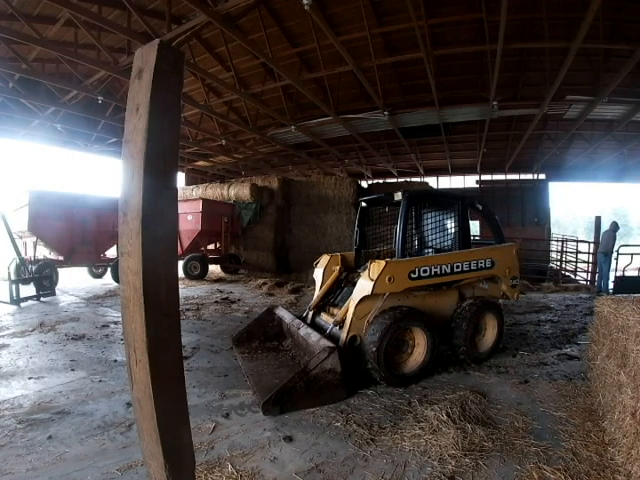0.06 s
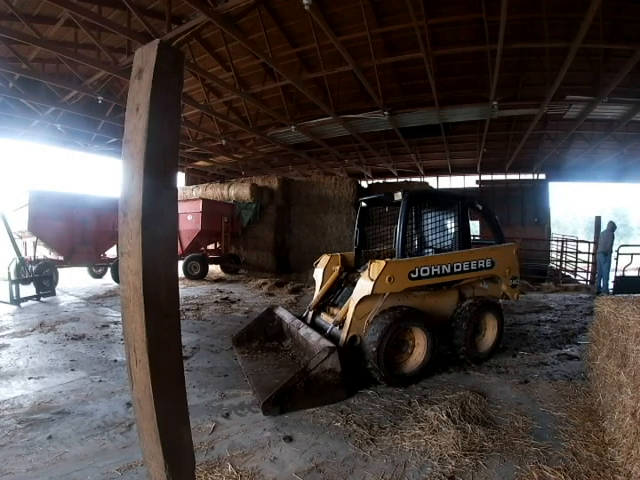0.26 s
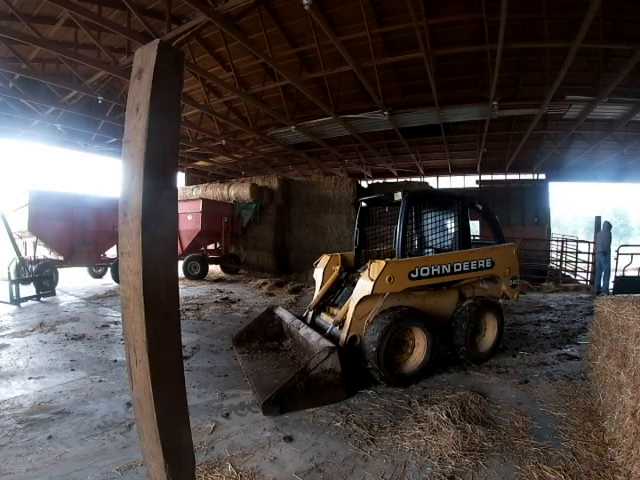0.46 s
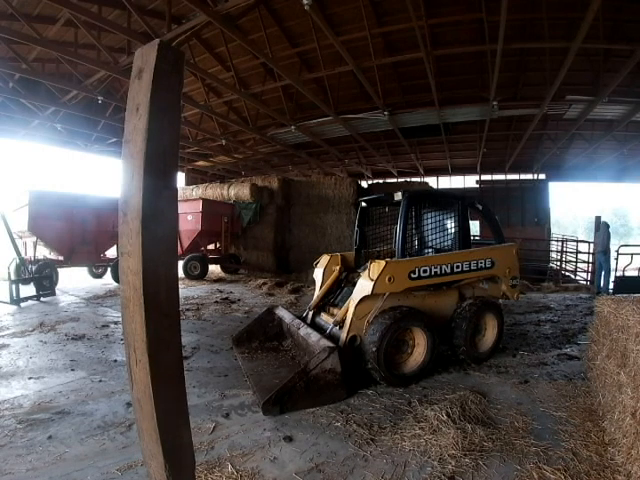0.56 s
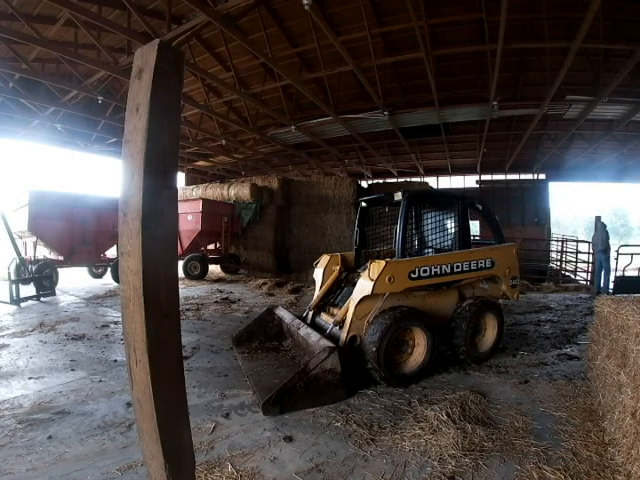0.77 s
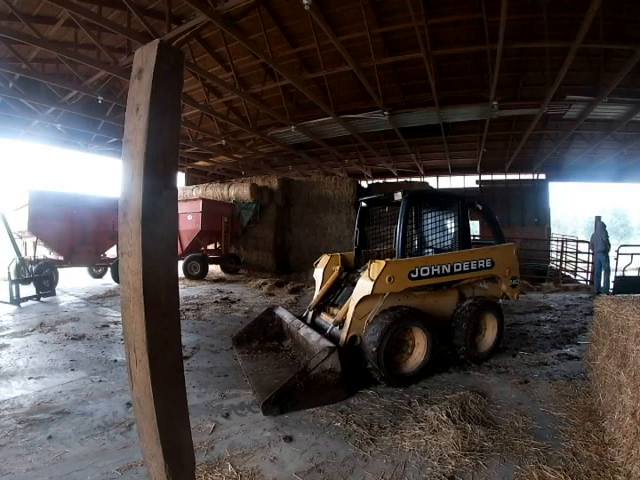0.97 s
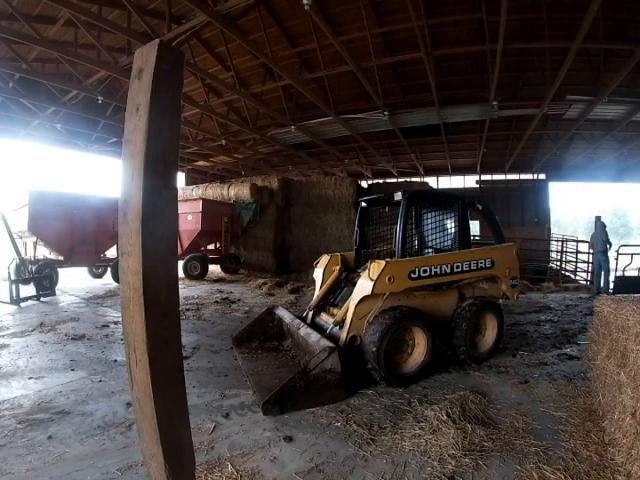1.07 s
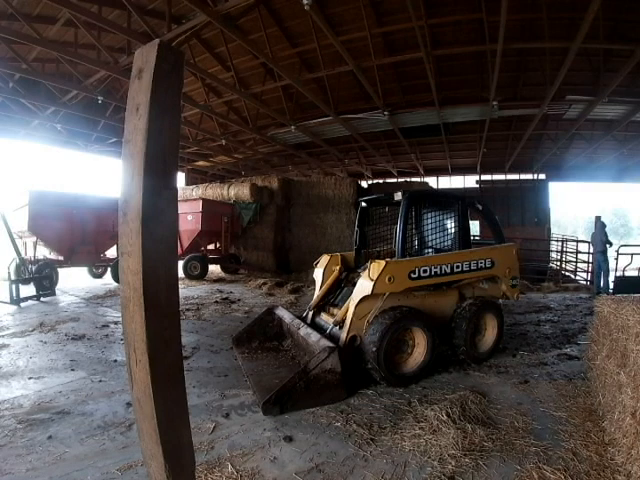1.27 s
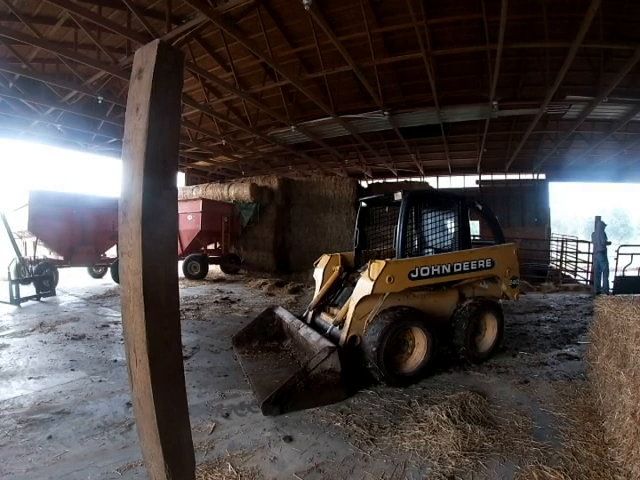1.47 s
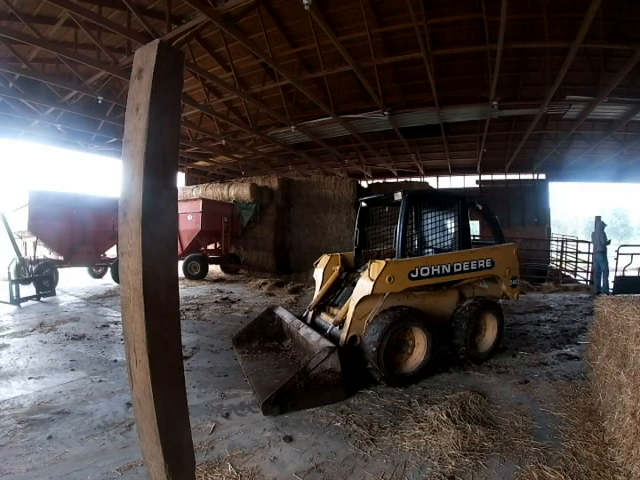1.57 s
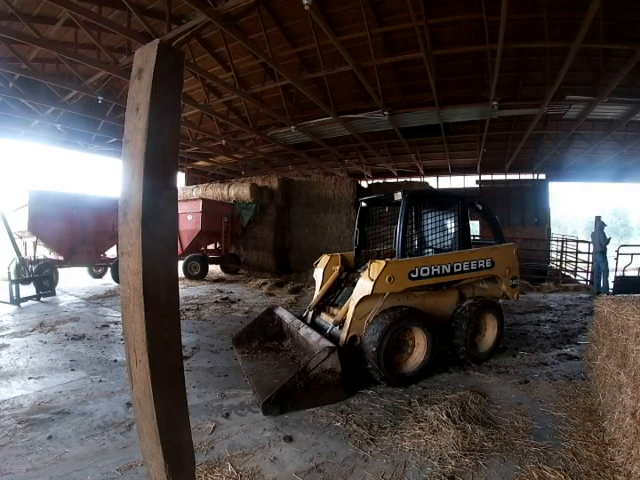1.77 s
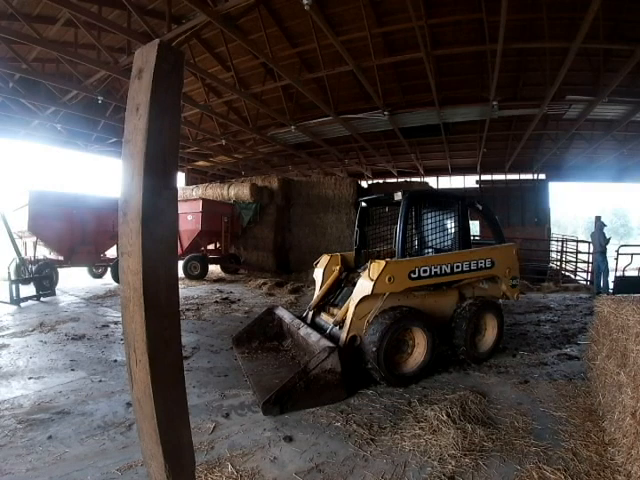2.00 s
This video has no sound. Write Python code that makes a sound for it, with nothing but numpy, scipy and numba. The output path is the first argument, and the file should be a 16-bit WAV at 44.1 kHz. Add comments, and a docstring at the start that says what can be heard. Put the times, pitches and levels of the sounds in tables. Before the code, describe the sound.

One loud cow moo swells from a hoarse closed-mouth groan, then drops to a grunt in an echoing barn

```python
"""A cow gives one long moo in a large echoing barn, over a faint rumble and a thin hiss of filtered noise.
It starts as a low hoarse groan, made of breathy pulses through the nose and a thin nostril whistle, and climbs.
As the mouth opens, the voice breaks into a loud clear bellow near 215 Hz: sine partials below, pulses through
throat resonances above, with a growl at its height. It sags into a rough grunt. Roof and walls answer
throughout, with a decaying noise echo and two ringing notes."""
import sys
import numpy as np
from scipy import signal
from scipy.fft import rfft, irfft
from scipy.io import wavfile
from scipy.ndimage import uniform_filter1d
from numba import njit

SR = 44100
rng = np.random.default_rng(int(sys.argv[2]) if len(sys.argv) > 2 else 0)


def generate_wav(sig):
    """Save sig (samples, or channels by samples) to the path in sys.argv[1] as 16-bit PCM at SR."""
    pcm = np.round(np.clip(np.atleast_2d(sig).T, -1, 1) * 32767).astype(np.int16)
    wavfile.write(sys.argv[1], SR, pcm)


N = 89743
TIME = np.arange(N) / SR  # seconds

# The five lowest partials of the voice, one curve each. Each row: time in seconds, level in dB.
PARTIAL_LEVELS = [
    [(.2, -73), (.46, -59), (.6, -36), (.69, -34.5), (.72, -34.5), (.81, -24.5), (1.01, -28.5),
     (1.08, -14.5), (1.28, -13), (1.75, -14.5), (1.82, -23.5), (1.9, -31.5), (2.0, -40.5)],
    [(.2, -59), (.47, -49.5), (.54, -40), (.64, -40), (.69, -29), (.75, -41), (.8, -36.5), (1.0, -52),
     (1.12, -34.5), (1.2, -48), (1.31, -34), (1.39, -43.5), (1.5, -27), (1.67, -41), (1.81, -34),
     (1.96, -29), (2.03, -39)],
    [(.15, -64), (.38, -47.5), (.55, -61), (.7, -57), (.79, -32), (.85, -62), (.9, -33), (1.11, -34.5),
     (1.18, -21), (1.39, -18), (1.46, -27), (1.56, -21), (1.74, -20), (1.79, -35.5), (1.86, -22.5),
     (1.92, -52)],
    [(.3, -58), (.7, -45.5), (.86, -41), (1.0, -42.5), (1.17, -25.5), (1.32, -42), (1.41, -36.5),
     (1.52, -57), (1.69, -52), (1.76, -41.5), (1.95, -63)],
    [(.3, -72), (.76, -47), (.825, -20), (.87, -30), (1.26, -30), (1.32, -39.5), (1.49, -30), (1.66, -41),
     (1.82, -29.5), (1.86, -21), (1.9, -28), (1.98, -88.5)],
]


def from_db(db):
    """Turn decibels into a gain."""
    return 10 ** (np.asarray(db) / 20)


def rms_one(x):
    """Scale to an rms (average strength) of 1."""
    return x / np.sqrt(np.mean(x ** 2) + 1e-20)


def in_time(rows):
    """Draw each column of a curve as straight lines, with a value at every sample."""
    s, *columns = np.transpose(rows)
    return [np.interp(TIME, s, c) for c in columns]


def at_hz(points, hz):
    """Read a table along a logarithmic frequency axis."""
    f, value = np.transpose(points)
    return np.interp(np.log(hz + 1e-9), np.log(f), value)


def drift(rate):
    """Random wandering with spread 1: noise smoothed by two equal low-pass stages at `rate` Hz."""
    r = np.exp(-2 * np.pi * rate / SR)
    wander = signal.lfilter([1], [1, -2 * r, r * r], rng.standard_normal(N + SR))
    return rms_one(wander[SR:])  # drop the first second, while the filter settles


def resonate(x, hz, width):
    """One resonance with gain 1 at its peak; a wider one dies away sooner."""
    r = np.exp(-np.pi * width / SR)
    feedback = [1, -2 * r * np.cos(2 * np.pi * hz / SR), r * r]
    return signal.lfilter(np.array([1, 0, -1]) * (1 - r * r) / 2, feedback, x)


def formants(x, modes):
    """Side-by-side resonances, each applied twice at double width, for dark valleys between them."""
    out = 0
    for hz, width, db in modes:
        once = resonate(x, hz, 2 * width)
        out = out + from_db(db) * resonate(once, hz, 2 * width)
    return out


@njit
def glide_resonate(x, turn, r):
    """A resonance whose centre (radians per sample) moves."""
    y = np.zeros(len(x))
    for i in range(2, len(x)):
        drive = (1 - r * r) / 2 * (x[i] - x[i - 2])
        y[i] = drive + 2 * r * np.cos(turn[i]) * y[i - 1] - r * r * y[i - 2]
    return y


def moving_formants(x, modes, stretch):
    """Side-by-side double resonances whose pitches all follow the curve `stretch`."""
    factor, = in_time(stretch)
    out = 0
    for hz, width, db in modes:
        turn = 2 * np.pi * hz * factor / SR
        r = np.exp(-2 * np.pi * width / SR)  # double width, as in formants()
        once = glide_resonate(x, turn, r)
        out = out + from_db(db) * glide_resonate(once, turn, r)
    return out


def cut(x, hz, kind, order=2):
    """High-pass or low-pass filter."""
    return signal.sosfilt(signal.butter(order, min(hz, SR / 2 - 100), kind, fs=SR, output="sos"), x)


def fold_phase(pitch, unsteadiness):
    """Add up a pitch in Hz, with its jitter, into the phase of a vibration."""
    return 2 * np.pi * np.cumsum(pitch * (1 + unsteadiness)) / SR


def fold_pulses(phase, count=54):
    """Sharp pulses of the vocal folds: `count` equal harmonics above the lowest partials, in one formula."""
    first = len(PARTIAL_LEVELS) + 1
    centre = first + (count - 1) / 2
    envelope = np.sin(count * phase / 2) / (np.sin(phase / 2) + 1e-12)
    return rms_one(envelope * np.cos(centre * phase))


def ambience():
    """Steady farmyard air, noise shaped to include a thin hiss, plus noise ringing a low rumble."""
    # Colour of the air. Each row: frequency in Hz, relative density in dB per Hz.
    air_colour = [(25, -35), (50, -17), (90, -11.5), (120, -3.5), (240, 0), (400, -14), (700, -11),
                  (1300, -14.5), (2400, -19), (3500, -25.5), (4400, -23.5), (4900, -12), (5450, -10.5),
                  (5900, -18), (6750, -19), (7050, -28.5), (8000, -35.5), (9000, -48.5), (9750, -35),
                  (10400, -56), (13000, -68.5)]
    # Strength of the rumble. Each row: time in seconds, level in dB.
    rumble_level = [(0, -54), (.35, -61.5), (.75, -57.5), (1.0, -50.5), (1.3, -57.5), (2.03, -62.5)]
    air_db, rumble_hz, rumble_width_hz = -51.5, 73, 11
    white = rfft(rng.standard_normal(N))
    hz = np.arange(len(white)) * SR / N
    air = irfft(white * from_db(at_hz(air_colour, hz)), N)
    rumble = formants(rng.standard_normal(N + SR), [(rumble_hz, rumble_width_hz, 0)])[SR:]
    rumble = rms_one(cut(rumble, 48, "high", order=4))
    rumble_db, = in_time(rumble_level)
    return from_db(air_db) * rms_one(air) + from_db(rumble_db) * rumble


def clean_partials(phase, rough):
    """Sine waves at the lowest partials carry the body of the moo; they flutter and fray when it is rough."""
    start_s, fade_s = 0.096, 0.19
    flutter_db = 2.5  # at full roughness; half of this for the first partial
    fray_rad, fray_hz = 0.45, 45  # phase scatter added per partial at full roughness, and its rate
    voiced = np.clip((TIME - start_s) / fade_s, 0, 1)
    out = 0
    for k, curve in enumerate(PARTIAL_LEVELS, 1):
        level_db = in_time(curve)[0] + flutter_db * rough * drift(40) * min(k, 2) / 2
        fray = fray_rad * (k - 1) * rough ** 2 * drift(fray_hz)
        out = out + from_db(level_db) * np.sin(k * phase + fray)
    return voiced * out


def roof_notes(x):
    """The call sets off notes that hang under the roof, as narrow resonances."""
    # Each row: pitch in Hz, width in Hz, level in dB.
    roof_modes = [(196.9, 3.6, -2), (627.5, 9.1, -5)]
    return sum(from_db(db) * resonate(x, hz, width) for hz, width, db in roof_modes)


def barn(x):
    """Diffuse echo of roof and walls: noise whose frequency bands die away at different speeds."""
    # How fast the echo fades. Each row: frequency in Hz, time in seconds to fall by 60 dB.
    fade_times = [(150, 0.76), (600, .9), (2000, 0.74), (5000, 0.38), (10000, 0.9)]
    first_echo_s = 0.012
    t, hz = TIME[:SR], np.arange(SR // 2 + 1.)
    white = rfft(rng.standard_normal(SR))
    centres = np.log([f for f, _ in fade_times])
    tail = 0
    for share, (_, t60) in zip(np.eye(len(centres)), fade_times):
        band = irfft(white * np.interp(np.log(hz + 1), centres, share), SR)
        tail = tail + band * from_db(-60 * t / t60)
    tail = tail * (t > first_echo_s)
    gain = np.sqrt(np.mean(np.abs(rfft(tail)[200:3000]) ** 2))  # typical gain from 200 to 3000 Hz
    return signal.fftconvolve(x, tail / gain)[:N]


def upper_voice(phase, level_db, bright_db, rough):
    """Fold pulses, and air let through once a cycle, ring the throat; brightness sets the treble."""
    # Throat and mouth. Each row: pitch in Hz before the jaw moves it, width in Hz, level in dB.
    throat_modes = [(1078, 130, 2), (1220, 69, -3), (1697, 173, -1), (1988, 200, -4.5), (2618, 162, -5.5),
                    (3003, 43, -11.5), (3690, 60, -18), (4220, 80, -16), (4750, 71, -21.5),
                    (5300, 156, -20.5), (5650, 200, -30)]
    # Resonances climb as the jaw drops and fall as it closes. Each row: time in seconds, pitch factor.
    jaw_curve = [(.62, 0.79), (.71, 1.055), (.78, 0.96), (.95, 1), (1.1, 1.016), (1.3, 0.98), (1.6, 0.979),
                 (1.78, 0.94), (1.86, 0.94), (1.94, 0.79)]
    rasp_db, voice_db = -4, -0.5  # air at full roughness; trim added to the level curve
    rasp_top_hz, bright_hz, top_hz = 2500, 3450, 7150
    pulses = fold_pulses(phase)
    noise = cut(rng.standard_normal(N), rasp_top_hz, "low")
    air = rms_one(noise * (1 + 0.46 * np.cos(phase)) ** 2)
    clear_share = np.sqrt(np.clip(1 - rough ** 2, .01, 1))
    source = pulses * clear_share * (1 + .5 * rough * drift(45)) + from_db(rasp_db) * rough * air
    voice = moving_formants(source, throat_modes, jaw_curve)
    voice = cut(cut(voice, 600, "high"), top_hz, "low")
    # Even out the loudness over 2200 samples (50 ms), so that the level curve decides it.
    voice = voice / np.sqrt(uniform_filter1d(voice ** 2, size=2200) + 1e-12)
    treble = cut(cut(voice, bright_hz, "high", order=4), bright_hz, "high", order=4)
    middle = cut(cut(voice, bright_hz, "low", order=4), bright_hz, "low", order=4)
    return from_db(level_db + voice_db) * (middle + from_db(bright_db) * treble)


def hoarseness(phase):
    """Irregular flapping of the folds, as noise swelling once a cycle, stirs the low resonances."""
    # Strength of the hoarse noise. Each row: time in seconds, level in dB.
    hoarse_level = [(.15, -65), (.42, -50), (.7, -64), (.8, -36.5), (1.12, -41), (1.3, -39), (1.5, -39.5),
                    (1.68, -59), (1.82, -56), (1.9, -19.5), (1.96, -39.5), (2.02, -75)]
    # Low resonances. Each row: pitch in Hz, width in Hz, level in dB.
    hoarse_modes = [(175, 150, -0.5), (288.5, 44.3, -0.5), (347, 86, -22.5), (585, 18, 6.5), (853, 64, -4),
                    (968, 96, -0.5)]
    level_db, = in_time(hoarse_level)
    flutter = rng.standard_normal(N) * (1 + 0.52 * np.cos(phase))
    noise = cut(formants(flutter, hoarse_modes), 170, "high", order=4)
    return from_db(level_db) * rms_one(noise)


def whistle():
    """Air, as noise, rings one narrow resonance of the nostrils near the start."""
    # Each row: time in seconds, level in dB.
    whistle_level = [(.15, -84), (.24, -58), (.4, -60), (.5, -67.5), (.6, -88)]
    whistle_hz, width_hz = 2410, 53
    level_db, = in_time(whistle_level)
    tone = formants(rng.standard_normal(N), [(whistle_hz, width_hz, 0)])
    return from_db(level_db) * rms_one(tone)


def nasal_groan(phase):
    """Slack, breathy pulses ring the nose while the mouth is still shut."""
    # Strength of the groan. Each row: time in seconds, level in dB.
    nasal_level = [(.18, -69.5), (.28, -55.5), (.42, -47), (.58, -47.5), (.7, -45.5), (.8, -74.5)]
    # Nose resonances. Each row: pitch in Hz before the sag, width in Hz, level in dB.
    nose_modes = [(557, 79, 4), (660, 33, -6.5), (835, 40, 0), (1323, 40, -8.5), (1710, 111, 0),
                  (2795, 77, -5.5)]
    # Sag of the nose resonances. Each row: time in seconds, factor on their pitch.
    nose_sag = [(.25, 1.08), (.42, 1.013), (.68, .94)]
    breath = 0.53 * rng.standard_normal(N) * (1 + np.cos(phase))
    source = fold_pulses(phase) + breath
    level_db, = in_time(nasal_level)
    return from_db(level_db) * rms_one(moving_formants(source, nose_modes, nose_sag))


def mouth_air(phase):
    """Air rushes through the open mouth as a thin hiss, let through once a cycle, with some fold pulses."""
    # Strength of the hiss. Each row: time in seconds, level in dB.
    air_level = [(.55, -76), (.7, -67.5), (.78, -60.5), (1.15, -59), (1.5, -64.5), (1.88, -63.5),
                 (1.97, -92)]
    # High resonances. Each row: pitch in Hz, width in Hz, level in dB.
    air_modes = [(6550, 1300, 0), (7360, 830, 6), (8900, 1100, -14.5), (11840, 750, -11.5)]
    level_db, = in_time(air_level)
    puffs = rng.standard_normal(N) * (1 + np.cos(phase))
    hiss = formants(puffs + 0.51 * fold_pulses(phase), air_modes)
    return from_db(level_db) * rms_one(hiss)


def rasps(phase):
    """Short throaty bursts of air, chopped by the folds, as the mouth opens and as it shuts."""
    # The bursts. Each row: time of the peak in seconds, level in dB, length in seconds.
    bursts = [(0.763, -35.5, .035), (1.863, -33.5, 0.04)]
    # Their resonances. Each row: pitch in Hz, width in Hz, level in dB.
    rasp_modes = [(760, 110, -6.5), (1076, 100, 0.5), (1286, 130, -3.5), (2130, 160, -12)]
    swell = sum(from_db(db) * np.exp(-((TIME - s) / length) ** 2) for s, db, length in bursts)
    chopped_air = rng.standard_normal(N) * (1 + np.cos(phase)) ** 2
    return swell * rms_one(formants(chopped_air, rasp_modes))


def voice_break(pitch):
    """A second, unsteady vibration of the folds, below the main one, sounds as the voice breaks."""
    # Each row: time in seconds, level of its fundamental in dB, level of its octave in dB.
    break_levels = [(.84, -72, -70.5), (.93, -35.5, -57.5), (1.02, -37, -27.5), (1.1, -36.5, -34.5),
                    (1.22, -42, -78), (1.3, -69, -51.5)]
    ratio = 0.8  # its pitch, as a share of the main pitch
    phase = fold_phase(pitch * ratio, 0.021 * drift(34))
    gate = (TIME > break_levels[0][0]) & (TIME < break_levels[-1][0])
    return gate * sum(from_db(db) * np.sin(k * phase) for k, db in enumerate(in_time(break_levels), 1))


def growl(phase):
    """Slow uneven flapping beats against the folds: returns a tone above the fundamental and a chopping gain."""
    # Each row: time in seconds, level of the tone in dB before it wavers.
    growl_level = [(1.12, -62.5), (1.22, -35), (1.33, -31.5), (1.5, -39), (1.6, -47), (1.7, -72)]
    flap_hz, wander, depth = 69, 0.204, 0.8  # wander is a share of flap_hz; depth is at the strongest point
    level_db, = in_time(growl_level)
    beat = fold_phase(flap_hz, wander * drift(28))
    strength = from_db(level_db) * (TIME > growl_level[0][0]) * (TIME < growl_level[-1][0])
    tone = strength * from_db(4.3 * drift(20)) * np.sin(phase + beat)
    chop = 1 + depth * strength / strength.max() * np.cos(beat)
    return tone, chop


def grunt():
    """The folds close with one last low flap: a very short bell-shaped burst of a cosine."""
    peak_s, level_db, flap_hz, length_s = 1.96, -17.5, 262.5, 0.0035
    t = TIME - peak_s
    return from_db(level_db) * np.exp(-(t / length_s) ** 2) * np.cos(2 * np.pi * flap_hz * t)


def scene():
    """The cow, its echo and the background; the echo is fed only the part of the low voice above 330 Hz."""
    # Pitch of the vocal folds. Each row: time in seconds, pitch in Hz.
    pitch_curve = [(.2, 101), (.38, 120.2), (.52, 145), (.62, 158.7), (.69, 167.3), (.75, 181.4),
                   (.81, 199.2), (.88, 202.5), (.99, 205.6), (1.11, 211.2), (1.24, 217.5), (1.33, 213.8),
                   (1.48, 218.2), (1.62, 216.2), (1.74, 213), (1.82, 205.9), (1.865, 199), (1.915, 184),
                   (1.97, 151.1)]
    # Force of the upper voice. Each row: time in seconds, level in dB before trims,
    # treble gain in dB, roughness (held to 0-1 below).
    effort_curve = [(.15, -77, -13.5, .8), (.42, -60, 25, .7), (.66, -48, -3.5, .6),
                    (.74, -31.5, -13.5, 0.42), (.82, -37.5, -18, 0.3), (.88, -30.5, -19, 0.16),
                    (.97, -30.5, -18, 0.4), (1.06, -30, -3, 0.3), (1.17, -27.5, -7, .2),
                    (1.33, -33.5, 3, 0.2), (1.5, -30, 1.5, 0.3), (1.68, -33, 2.5, 0.07),
                    (1.78, -29.5, 3, 0.33), (1.86, -28, -7, 0.32), (1.91, -39, -13, 1.1),
                    (1.96, -60, -16, .9), (2.02, -60, 24, 0.4)]
    jitter, jitter_hz = 0.02127, 71.5  # pitch unsteadiness at full roughness (share of pitch), and its rate
    upper_wet_db, low_wet_db, echo_low_cut_hz = 3.5, -14, 330  # how much of each voice part feeds the echo
    pitch, = in_time(pitch_curve)
    level_db, bright_db, rough = in_time(effort_curve)
    rough = np.clip(rough, 0, 1)
    phase = fold_phase(pitch, jitter * rough * drift(jitter_hz))
    growl_tone, chop = growl(phase)

    low = clean_partials(phase, rough) + voice_break(pitch) + growl_tone + grunt()
    upper = chop * upper_voice(phase, level_db, bright_db, rough)
    upper = upper + hoarseness(phase) + nasal_groan(phase) + mouth_air(phase) + rasps(phase) + whistle()
    upper = upper / np.hypot(1, from_db(upper_wet_db))  # make room for the echo

    low_to_echo = from_db(low_wet_db) * cut(low, echo_low_cut_hz, "high", order=4)
    echo = barn(low_to_echo + from_db(upper_wet_db) * upper)
    return (low + upper + echo + roof_notes(low + upper) + ambience())[None]


def record(dry):
    """A steep low-pass cuts the top: 70 dB down from 14500 Hz upward."""
    return signal.sosfilt(signal.cheby2(12, 70, 14500, fs=SR, output="sos"), dry)


dry = scene()
out = record(dry)
generate_wav(out)
```